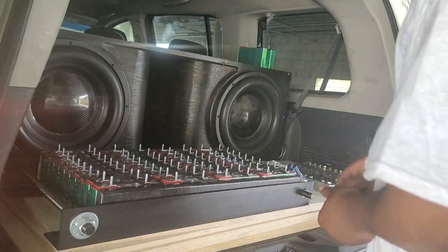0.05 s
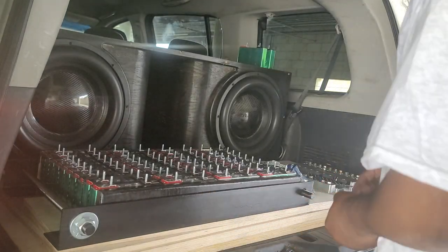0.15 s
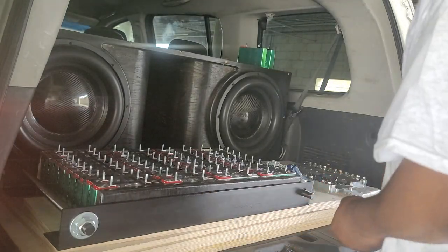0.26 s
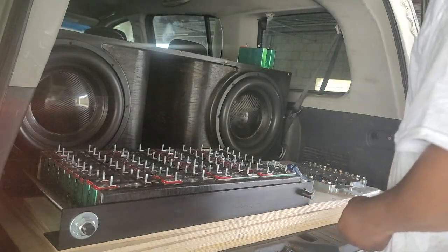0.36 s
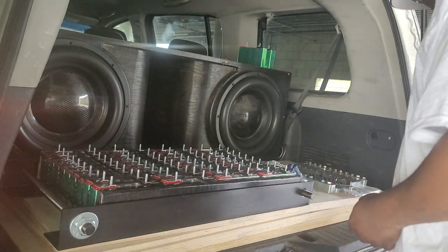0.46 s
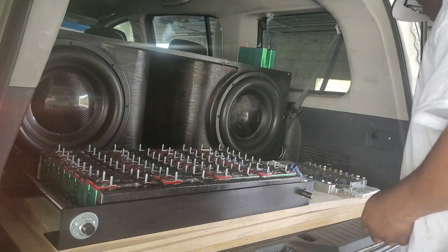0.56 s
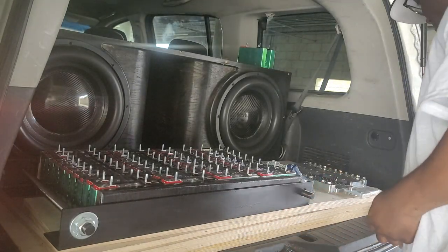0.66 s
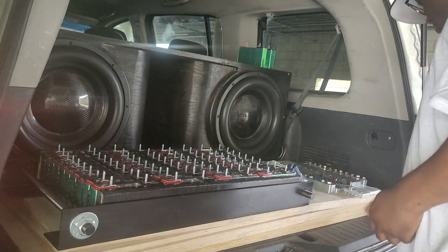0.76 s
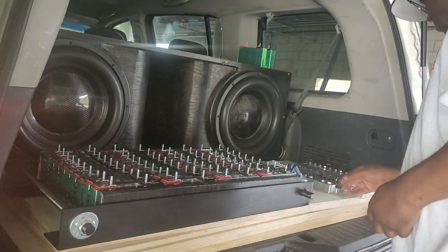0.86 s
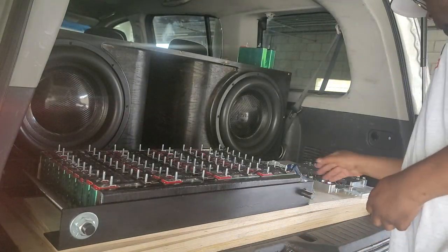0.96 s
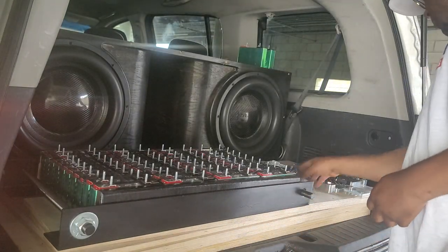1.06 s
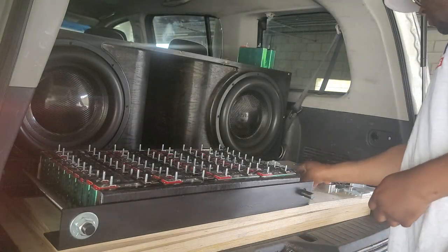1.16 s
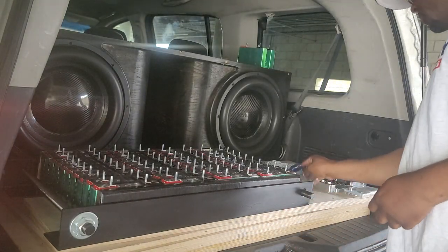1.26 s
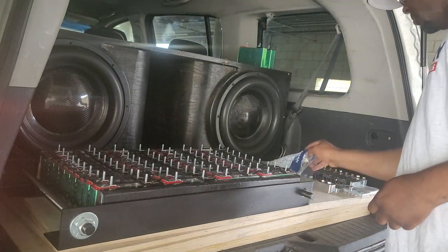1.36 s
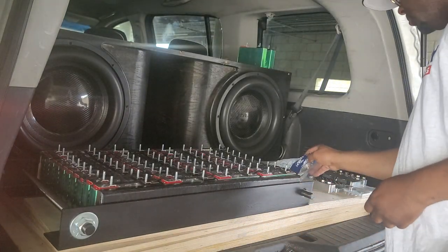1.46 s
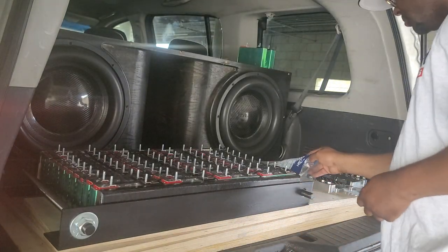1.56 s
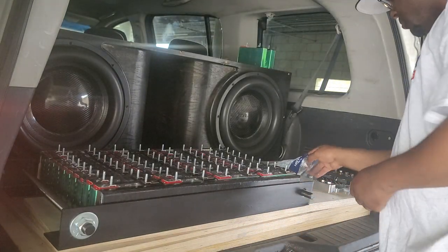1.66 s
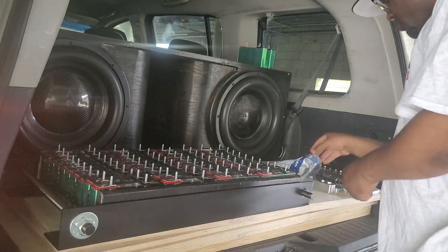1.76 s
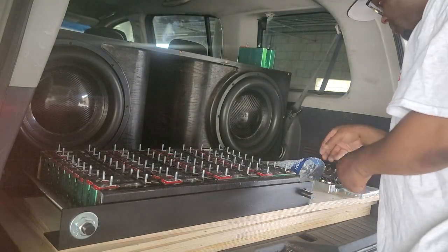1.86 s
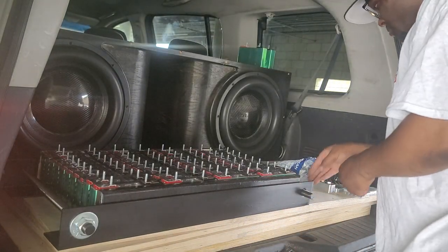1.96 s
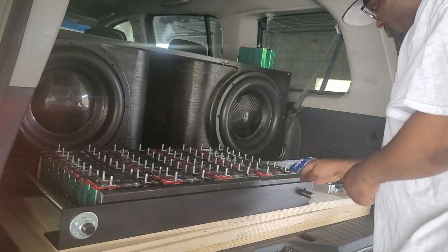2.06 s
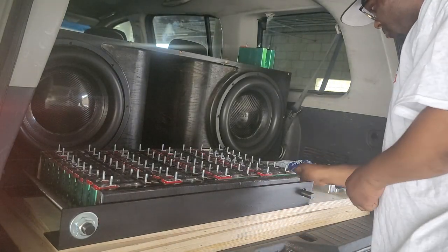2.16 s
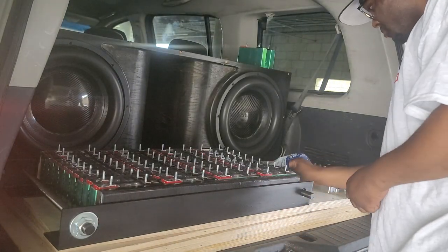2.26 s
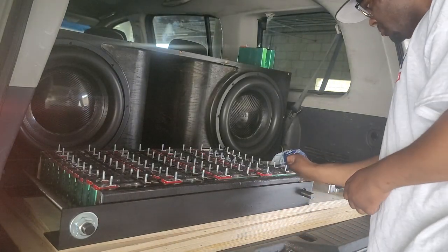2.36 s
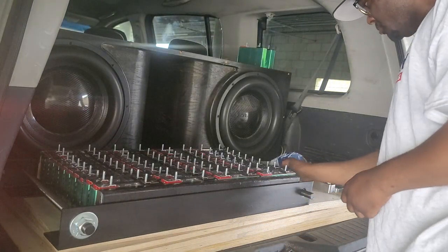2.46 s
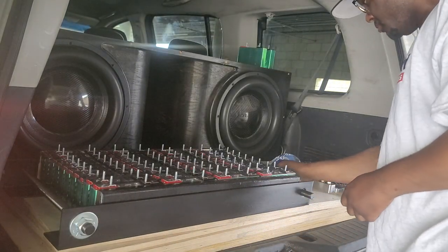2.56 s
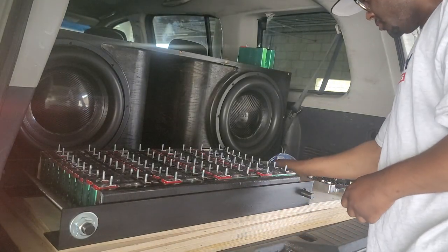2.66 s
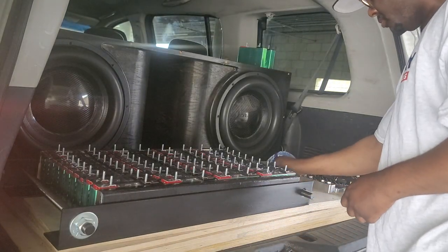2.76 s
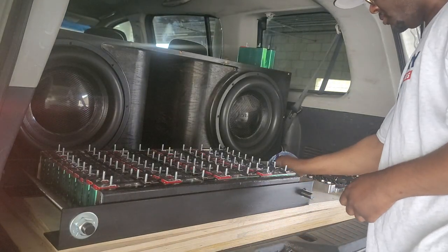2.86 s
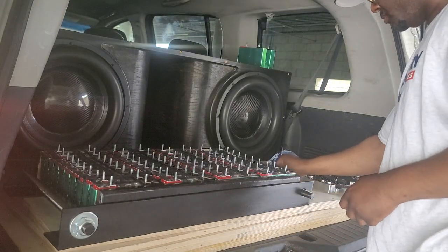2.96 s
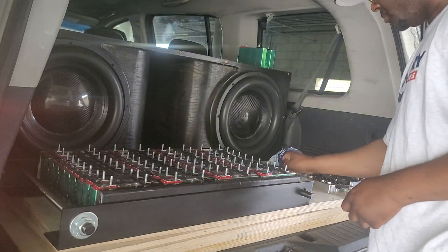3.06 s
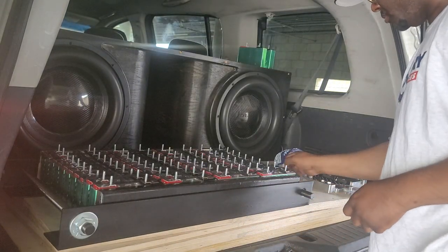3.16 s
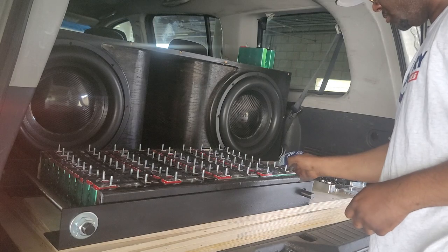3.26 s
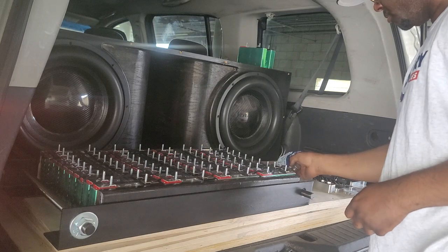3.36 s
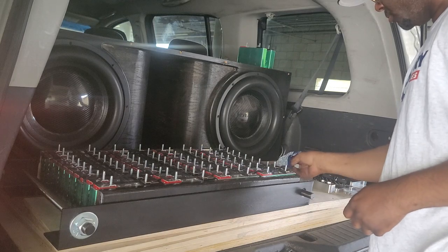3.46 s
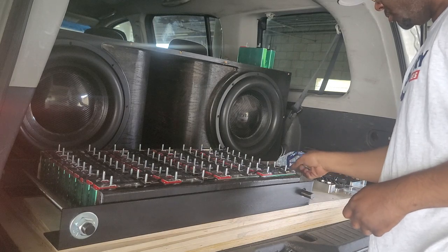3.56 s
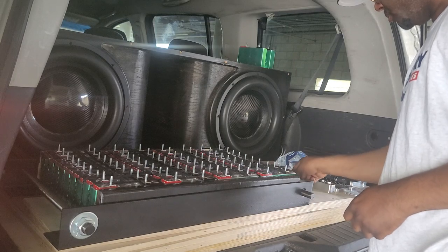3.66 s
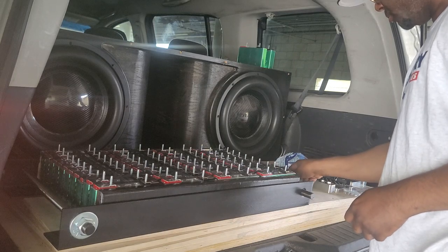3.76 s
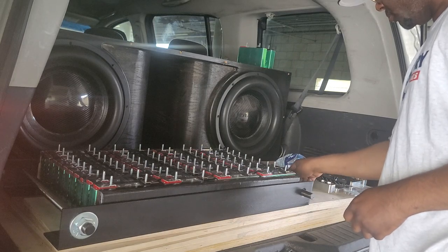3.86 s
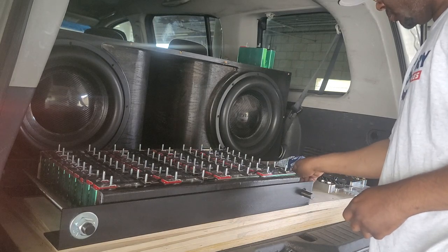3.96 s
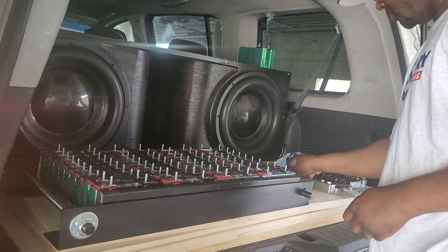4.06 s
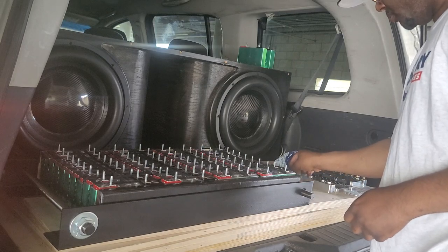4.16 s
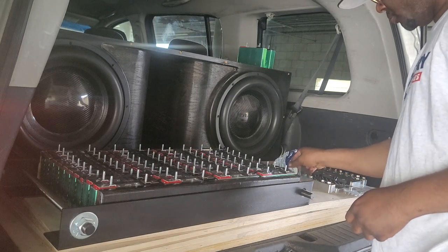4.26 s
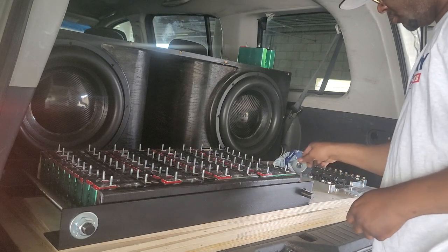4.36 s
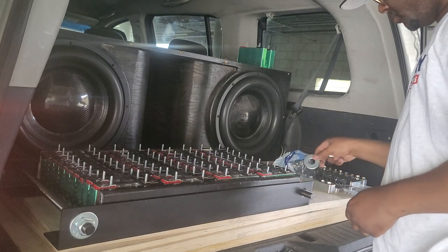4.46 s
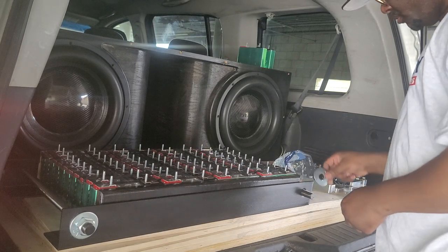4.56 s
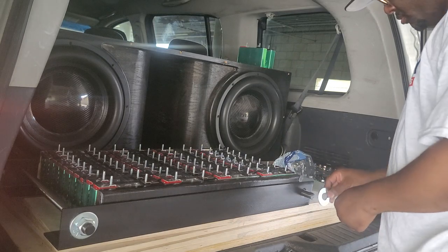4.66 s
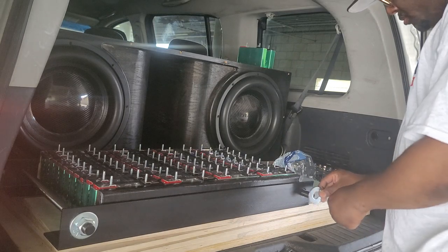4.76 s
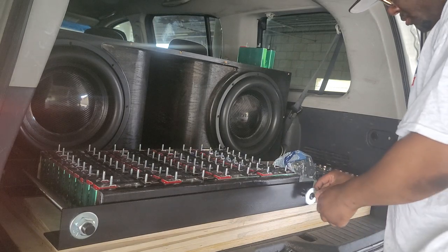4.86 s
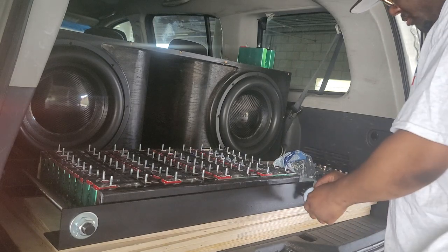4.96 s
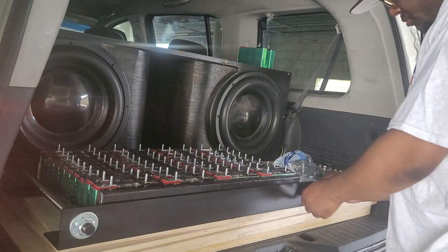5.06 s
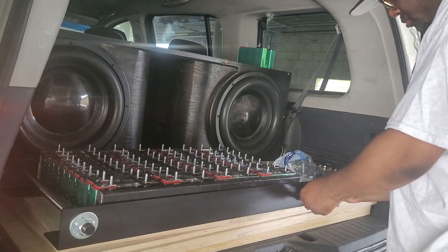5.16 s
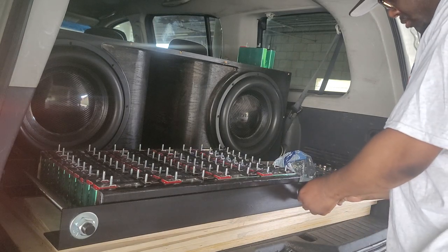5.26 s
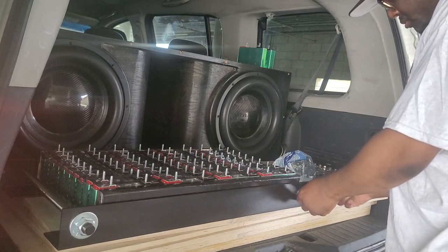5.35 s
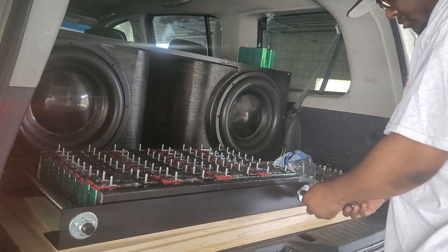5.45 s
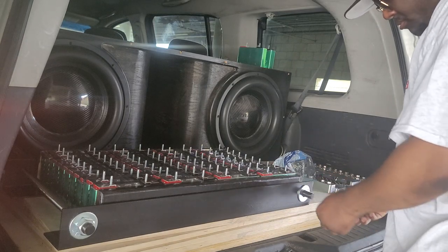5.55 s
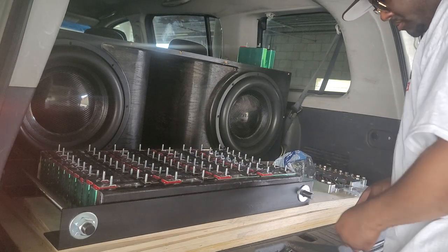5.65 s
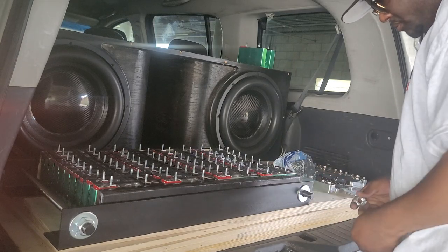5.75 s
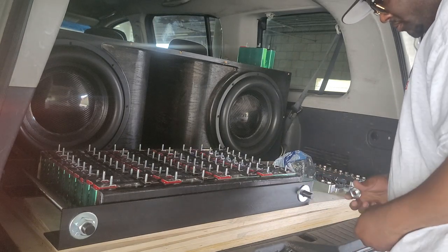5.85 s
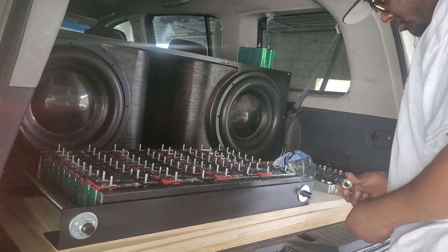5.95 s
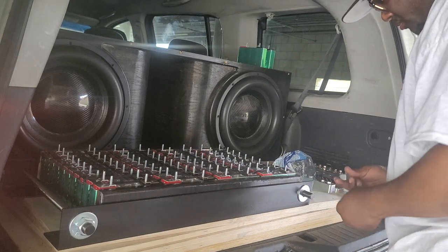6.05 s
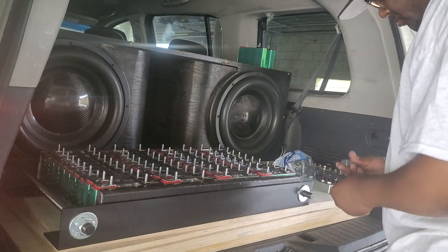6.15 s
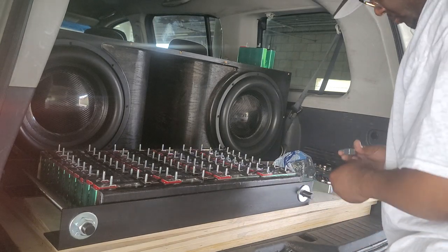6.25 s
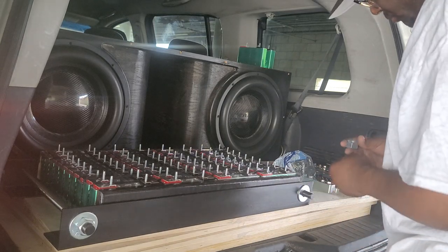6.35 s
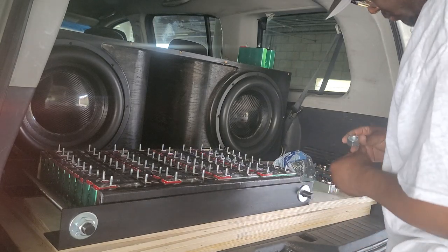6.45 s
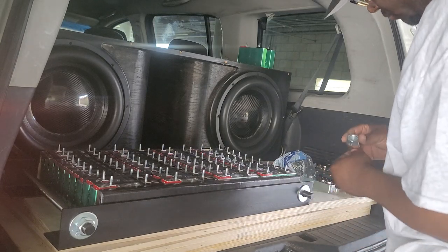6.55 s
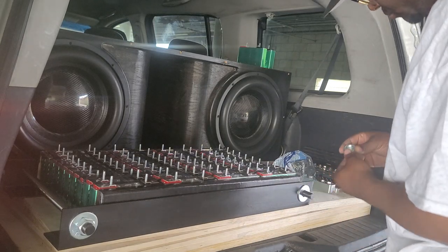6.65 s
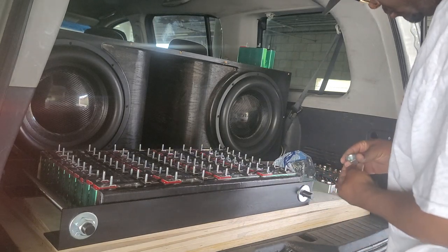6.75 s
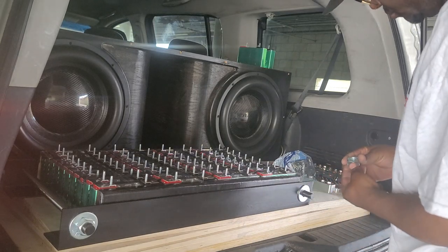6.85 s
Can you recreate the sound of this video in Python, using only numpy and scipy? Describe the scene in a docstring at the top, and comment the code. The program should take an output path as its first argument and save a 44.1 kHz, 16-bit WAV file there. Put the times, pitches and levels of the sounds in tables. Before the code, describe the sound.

A low, wavering drone of distant engines and soft outdoor rumble runs throughout, heard from the open back of a parked car. Around 0.6-0.8 s there is a faint scuff of clothing or shoes. From 1.2 s a hand digs into a thin plastic bag, crinkling; at 1.5-1.7 s washers clink loudly in a dense, bright cluster with firm knocks on the wooden board, one ringing on briefly. Softer crackling follows, with sharper clinks and knocks at 2.7-2.9 s, another handful at 3.05-3.5 s, and lighter ones at 3.9-4.3 s. The bag settles by about 4.6 s. At 4.9-5.05 s a washer ticks along a threaded rod, touches again near 5.37 s, then claps twice on a metal panel at 5.42 s, leaving a short metallic ring. Faint scuffs, tiny ticks and a dull board knock around 6.1 s precede quiet rumble until about 6.9 s.

```python
"""Steel washers in a plastic bag

In the open back of a parked car, a hand digs through a bag of washers lying on a wooden board.
The film crinkles as bursts of filtered noise; the washers clink as clusters of decaying sine modes.
One is slid onto a threaded rod and claps against a metal panel: noise contacts, then lasting modes.
Knocks, ticks and scuffs accompany it. Distant engines drone as wavering sines over rumbling noise.
"""
import sys
import numpy as np
from scipy import signal
from scipy.fft import rfft, irfft
from scipy.io import wavfile
from scipy.ndimage import map_coordinates

SR = 44100
rng = np.random.default_rng(int(sys.argv[2]) if len(sys.argv) > 2 else 0)


def inscribe(sig):
    """Save sig as 16-bit PCM at rate SR to the path in sys.argv[1].

    A 1-D sig is mono; a 2-D sig holds one channel per row.
    Samples are clipped to [-1, 1] before scaling.
    """
    pcm = np.round(np.clip(np.atleast_2d(sig).T, -1, 1) * 32767)
    wavfile.write(sys.argv[1], SR, pcm.astype(np.int16))


N = 304554
TIME = np.arange(N) / SR
AGE = TIME[:SR]   # the second after a blow

# Spectrum of the outdoor rumble: f/Hz, relative level/dB
AIR_SPECTRUM = [(15, -28.5), (30, -12), (45, -14.5), (60, -9), (76, -3), (97, -13), (120, -7.5), (148, -22),
                (290, -21.5), (420, -26.5), (600, -24.5), (2500, -40.5), (7000, -51.5), (9500, -64)]
# Likeness of the rumble in left and right: f/Hz, correlation
AIR_LIKENESS = [(60, 0.91), (150, 0.86), (300, 0.63), (700, 0), (2000, 0), (15000, 0.21)]
# Low drone of the distant engines: t/s, level/dB
DRONE_LEVEL = [(0.0, -45), (0.13, -41.5), (0.75, -62.5), (1.36, -49.5), (1.71, -55), (1.81, -46),
               (2.64, -45.5), (2.9, -58), (3.31, -40.5), (4.33, -62.5), (4.6, -50), (4.62, -57.5),
               (5.86, -44), (6.35, -55.5), (6.73, -44), (6.91, -47)]
# Hum of the idling engine: t/s, relative level/dB
HUM_LEVEL = [(0.0, -66), (1.29, -72.5), (2.0, -58.5), (2.58, -66), (3.25, -53), (4.08, -65.5), (6.91, -67)]
# Knocks on the board, and at 5.295 s a dull bump of the washer sliding along the rod's thread: t/s, relative
# level/dB, contact cut-off f/Hz
BOARD_KNOCKS = [(.35, -46, 1600), (1.545, -17.5, 2150), (1.563, -24, 3020), (1.569, -12, 3700),
                (1.624, -24, 1450), (1.647, -24.5, 1560), (1.674, -19, 3060), (1.72, -28, 2590),
                (2.609, -35, 2480), (2.708, -25, 3270), (2.846, -32.5, 3460), (2.883, -16.5, 3450),
                (3.023, -37, 1360), (3.301, -28.5, 3070), (3.378, -28, 2190), (3.547, -41, 1790),
                (3.754, -44.5, 900), (4.091, -28.5, 1650), (5.028, -29, 3300), (5.295, -41, 935),
                (6.105, -22.5, 1795)]
# Colour of a knock on the board: f/Hz, relative level/dB
BOARD_SPECTRUM = [(150, -29), (330, -10), (480, -5), (620, 7.5), (800, -4.5), (1050, 2), (1300, 1),
                  (1700, -3), (2200, -3.5), (3100, -4), (4000, -11.5), (8000, -2)]
# Longer resonances of the board: f/Hz, relative level/dB, t60/s
BOARD_RESONANCES = [(542, -9.5, 0.11), (602, -5, 0.4), (664, -7.5, 0.091), (770, -10.5, 0.17),
                    (985, -3.5, .16)]
# Shoes and clothes scuffing: t/s, length/s, level/dB
SCUFF_STROKES = [(.64, 0.02, -56.5), (.742, 0.098, -50), (5.8, .07, -61), (6.07, 0.094, -61.5)]
# Colour of a scuff: f/Hz, relative level/dB
SCUFF_SPECTRUM = [(710, -42.5), (1200, -8.5), (1970, -10), (2250, -11.5), (3460, -1), (4710, -5),
                  (7030, -10.5), (14000, -54.5)]
# Small ticks of fingers and metal: t/s, relative level/dB
HAND_TICKS = [(3.5132, -40.5), (4.5344, -50), (4.5776, -56.5), (5.215, -59), (6.0696, -52), (6.155, -52)]
# Movements of the hand in the bag: t/s, length/s, relative crinkle level/dB
BAG_DIGS = [(1.203, 0.12, -55.5), (1.25, 0.17, -52), (1.401, 0.31, -41.5), (1.732, .14, -48),
            (2.189, 0.21, -50.5), (2.4, 0.23, -60.5), (2.552, 0.2, -48), (2.809, .25, -51),
            (3.101, 0.1, -46.5), (3.232, 0.17, -49.5), (3.4, 0.093, -57), (3.826, 0.052, -53.5),
            (3.978, 0.18, -54.5), (4.215, 0.1, -53), (4.352, 0.06, -63.5)]
# Colour of a snapping crease: f/Hz, relative level/dB
BAG_SPECTRUM = [(200, -17.5), (400, 0), (620, 8.5), (850, 2), (1700, 3.5), (2700, 1), (3900, -1.5),
                (5500, 2.5), (7000, 1.5), (9000, -8.5), (11500, -4.5), (14000, -15.5), (15700, -6)]
# Clearest meetings of washers: t/s, relative tick level/dB, relative ring level/dB, lowest-mode t60/s
WASHER_CLINKS = [(1.492, -22, -25.5, 0.23), (1.505, -19, -14.5, 0.094), (1.521, -23, -20, 0.25),
                 (1.568, -14, -17, 0.094), (1.586, -18, -23.5, .2), (1.6733, -24, -22, 0.11),
                 (1.6859, -21.5, -24.5, .12), (1.713, -30, -27.5, .08), (1.801, -45, -36.5, 0.0734),
                 (2.4946, -51, -54.5, .08), (2.588, -34.5, -44, .16), (2.7054, -24, -27.5, 0.053),
                 (2.8442, -33.5, -38, 0.084), (2.8823, -20, -21, 0.045), (3.054, -36.5, -31.5, 0.12),
                 (3.129, -26, -23.5, 0.11), (3.177, -26.5, -27, .12), (3.1995, -27, -21.5, 0.12),
                 (3.2988, -34, -34, 0.203), (3.347, -27.5, -37.5, 0.2), (3.4527, -33.5, -38, 0.17),
                 (3.8804, -30, -48, .1), (4.027, -26.5, -38, 0.061), (4.0554, -30.5, -45.5, .16),
                 (4.109, -36.5, -40, 0.14), (4.242, -42, -40.5, 0.084), (4.2837, -41, -42.5, 0.14),
                 (5.365, -44, -43.5, 0.21), (5.418, -35, -31, 0.052)]
# Bending modes of a washer: mean f/Hz, relative spread between washers, left-right level/dB
WASHER_MODES = [(5347, 0.027, 2), (10370, 0.014, 1.5), (13830, 0.024, -2.5)]
# A washer swings free and rings on: t/s, lowest mode f/Hz, level/dB, t60/s, left-right level/dB
FREE_WASHERS = [(1.505, 5200, -21, .14, 13), (1.572, 5355, -13, 0.32, 10), (1.676, 5320, -39.5, 0.87, -10),
                (3.057, 5360, -41.5, .61, 2), (3.131, 5190, -21.5, 0.071, 22), (3.454, 5220, -33.5, 0.2, 2)]
# Washer touching the rod: t/s, contact level/dB, contact cut-off f/Hz, relative ring level/dB
ROD_CONTACTS = [(4.9163, -39, 7160, -19.5), (4.935, -41.5, 5000, -23.5), (5.005, -31.5, 2080, -36),
                (5.0261, -33, 2500, -31), (5.362, -36.5, 4430, -60.5), (5.375, -37, 2150, -55.5)]
# Colour of a contact on the rod: f/Hz, relative level/dB
ROD_SPECTRUM = [(200, -37), (450, -4.5), (950, -3), (1150, -6), (1450, 2), (1800, -2), (2500, -4),
                (5000, 0), (9000, -10.5), (16000, -15.5)]
# Modes of that washer: f/Hz, relative gripped level/dB, lingering level re contact/dB, lingering t60/s
ROD_WASHER_MODES = [(2514, -32, -30, .4), (3092, -13, -18, .7), (4554, -34, -29, .7), (5502, -1, -29, .6),
                    (5545, -14, -32, .55), (5582, -9, -30, .3), (6210, -22, -31, .65), (8125, -36, -42, .7),
                    (10170, -24, -36, .3), (10970, -31, -50, .2), (14860, -38, -47, .37)]
# Washer clapping against the panel: t/s, level/dB, t60/s
PANEL_CLAPS = [(5.418, -26, 0.066), (5.4372, -24.5, 0.056)]
# Colour of a clap on the panel: f/Hz, relative level/dB
PANEL_SPECTRUM = [(200, -27), (600, -10.5), (900, -7), (1200, -2.5), (1700, 0.5), (2000, -5), (3000, -1.5),
                  (3550, 2.5), (4400, -8.5), (5500, -2.5), (8500, -16), (10300, -16), (12500, -29),
                  (13750, -15), (15000, -28)]
# Lasting modes of the metalwork: f/Hz, relative level/dB, t60/s
METALWORK_MODES = [(1140, -6, .25), (2266, -8, 0.51), (2320, -3.5, 1), (2480, -6.5, 0.85), (2860, 0, 0.57),
                   (2770, -3.5, 0.53), (3140, -7, 0.55), (3100, -10.5, 0.98), (3490, -3, 0.4),
                   (3686, -5.5, 1.0), (3800, -7, 1), (3700, -6, 0.75), (5440, -23, .9), (10260, -17, 0.37),
                   (14020, -20, 0.42)]


def from_db(db):
    """Level: amplitude is ten to the power of dB / 20."""
    return 10 ** (np.asarray(db) / 20)


def rms_one(x):
    """Normalization: equal mean power gives rms 1."""
    return x / np.sqrt(np.mean(x ** 2) + 1e-20)


def struck(x):
    """Normalization of a blow: rms 1 over its first 20 ms."""
    return x / np.sqrt(np.mean(x[:, :SR // 50] ** 2) + 1e-20)


def fade(t60, size=SR):
    """Exponential damping: 60 dB are lost in t60 seconds."""
    return np.exp(-np.log(1000) * AGE[:size] / max(t60, .003))


def swell(rise, size=SR):
    """Exponential build-up with time constant rise, in seconds."""
    return 1 - np.exp(-AGE[:size] / rise)


def pan(db):
    """Stereo level difference: left exceeds right by db."""
    return from_db(np.array([[db], [-db]]) / 2)


def at_hz(points, hz):
    """Interpolation on a logarithmic frequency axis."""
    f, value = np.transpose(points)
    return np.interp(np.log(hz + 1), np.log(f), value)


def level(rows):
    """Envelope: gain along a curve of dB over time."""
    return from_db(np.interp(TIME, *np.transpose(rows)))


def add(out, s, sound):
    """Superposition: a sound joins the sum at s seconds."""
    start = int(s * SR)
    out[:, start:start + sound.shape[1]] += sound[:, :N - start]


def colour(x, spectrum):
    """Minimum-phase filtering: the folded cepstrum gives a causal response with this spectrum."""
    size = 2048
    magnitude = from_db(at_hz(spectrum, np.fft.rfftfreq(size, 1 / SR)))
    cepstrum = irfft(np.log(magnitude))
    cepstrum[1:size // 2] *= 2
    cepstrum[size // 2 + 1:] = 0
    response = irfft(np.exp(rfft(cepstrum)))
    return signal.oaconvolve(x, response[None], axes=1)[:, :x.shape[1]]


def drift(rate):
    """Slow random variation: a spline through unit-variance knots, rate of them per second."""
    knots = rng.standard_normal(2048)
    coarse = TIME[::100]
    return np.interp(TIME, coarse, map_coordinates(knots, [coarse * rate], order=3, mode="wrap"))


def blow(spectrum, t60, cut_hz=None, rise=0.001, alike=0.34, order=8):
    """Impact: noise, smeared by quick reflections off nearby boxes, coloured by the struck body."""
    size = SR // 8
    shared, own = rng.standard_normal(size), rng.standard_normal((2, size))
    burst = (own + alike * shared) * fade(t60, size) * swell(rise, size)
    x = colour(burst, spectrum)
    if cut_hz:   # a soft contact lacks treble
        lowpass = signal.butter(order, min(cut_hz, SR * .45), fs=SR, output="sos")
        x = signal.sosfilt(lowpass, x)
    return struck(x)


def ring(hz, envelope, scatter=0.21):
    """Normal mode: a sine whose phase differs at each microphone; scatter is in cycles."""
    phase = rng.random() + scatter * rng.standard_normal((2, 1))
    return np.sin(2 * np.pi * (hz * AGE[:len(envelope)] + phase)) * envelope


def cluster(hz, spread, envelope, count=8):
    """Beating: close modes scattered around one pitch interfere."""
    offsets = np.linspace(-1.6, 1.6, count) + rng.uniform(-.2, .2, count)
    return struck(sum(np.exp(-k * k / 4) * ring(hz * (1 + spread * k), envelope) for k in offsets))


def strokes(rows, attack_s, t60):
    """Movement envelope: each stroke builds up, holds for its length and dies away."""
    out = np.zeros((1, N))
    for s, length, db in rows:
        release_db = -60 * np.maximum(AGE - length, 0) / t60
        add(out, s, from_db(db + release_db) * np.minimum(AGE / attack_s, 1)[None])
    return out[0]


def outdoors(air_db=-48, drone_hz=42.8, hum_hz=78.7, hum_db=-1, waver_hz=0.95):
    """Partly coherent noise makes the rumble; frequency-modulated sines make drone and overtones."""
    hz = np.fft.rfftfreq(N, 1 / SR)
    mid, side = rfft(rng.standard_normal((2, N))) * from_db(at_hz(AIR_SPECTRUM, hz))
    alike = np.clip(at_hz(AIR_LIKENESS, hz), -1, 1)
    opposed = side * [[1], [-1]]
    air = rms_one(irfft(np.sqrt(1 + alike) * mid + np.sqrt(1 - alike) * opposed, N))
    drone = np.sin(2 * np.pi * np.cumsum(drone_hz + waver_hz * drift(4.6)) / SR)
    turn = 2 * np.pi * np.cumsum(hum_hz + .5 * drift(6.5)) / SR
    hum = np.sin(3 * turn) + np.sin(2 * turn)   # overtones only
    engines = level(DRONE_LEVEL) * drone + from_db(hum_db) * level(HUM_LEVEL) * hum
    return (from_db(air_db) * air + np.sqrt(2) * engines) * pan(-0.64)   # sqrt 2: sine rms to peak


def board(gain_db=-11, side_db=-3.0, knock_t60=0.057, soft_hz=1742, soft_ring_db=-25.5, db_per_octave=10):
    """Contact stiffness: washers and knuckles bump wood, and a washer sliding on the thread bumps dully; softer
    contacts dull it and damp its ring."""
    out = np.zeros((2, N))
    for s, db, cut_hz in BOARD_KNOCKS:
        knock = blow(BOARD_SPECTRUM, knock_t60, cut_hz, rise=0.0017, alike=0.78)
        add(out, s, from_db(db + gain_db) * knock)
        ring_db = db + soft_ring_db + db_per_octave * np.log2(cut_hz / soft_hz)
        for hz, mode_db, mode_t60 in BOARD_RESONANCES:
            add(out, s, from_db(ring_db + mode_db) * ring(hz, fade(mode_t60, size=SR // 4)))
    return out * pan(side_db)


def handling(tick_db=-12, tick_t60=0.0277, attack_s=0.0039, scuff_t60=0.16):
    """Friction and impact: shifting weight scuffs as enveloped noise, the hand ticks as short bursts."""
    rubbing = rms_one(colour(rng.standard_normal((2, N)), SCUFF_SPECTRUM))
    out = strokes(SCUFF_STROKES, attack_s, scuff_t60) * rubbing
    for s, db in HAND_TICKS:
        tick = blow([(800, -27), (6000, 13.0), (15000, -2)], tick_t60)
        add(out, s, from_db(db + tick_db) * tick)
    return out


def bag_effort(left_s=4.5, jolt_db=-23, jolt_s=.008, patchy_db=2.0):
    """Driving force: film gives way under the hand, then settles; clinks jolt it until the hand is out."""
    jolts = [(s, jolt_s, tick_db + jolt_db) for s, tick_db, ring_db, t60 in WASHER_CLINKS if s < left_s]
    digging = strokes(BAG_DIGS, attack_s=0.038, t60=0.28)
    jolting = strokes(jolts, jolt_s, t60=0.095)
    return np.hypot(digging, jolting) * from_db(patchy_db * drift(40))


def bag(per_s=900, size_db=2.0, snap_t60=0.025, gain_db=6.0, grind_db=-7, shift_db=3.0, count=16):
    """Crackling noise: differently coloured creases snap at random; washers faintly resonate with them."""
    effort = bag_effort()
    creases = []
    for _ in range(count):
        spectrum = [(hz, db + shift_db * rng.standard_normal()) for hz, db in BAG_SPECTRUM]
        creases.append(blow(spectrum, snap_t60))
    sizes = from_db(size_db * np.minimum(rng.exponential(1, N), 4)) * rng.choice([-1, 1], N)
    moving = effort > 1e-7
    film = np.zeros((2, N))
    for i in np.flatnonzero(moving & (rng.random(N) < per_s / SR)):
        add(film, TIME[i], sizes[i] * creases[i % count][:, :SR // 40])
    film = film / film[:, moving].std() * effort
    grind = np.zeros((2, N))   # the movement grinds the washers together
    for hz, spread, side_db in WASHER_MODES:
        b, a = signal.iirpeak(hz, 1 / (2 * spread), fs=SR)
        grind += signal.lfilter(b, a, film + 1e-18)
    return from_db(gain_db) * (film + from_db(grind_db) * grind)


def stray_clinks(per_s=12, tick_db=9.5, ring_db=-1, t60=.1, scatter_db=6.5):
    """Random events: faint clinks strew each dig, their strength scattered about that of the dig."""
    rows = []
    for s, length, db in BAG_DIGS:
        for chance, place, strength in rng.random((4, 3)):
            if chance < per_s * length / 4:   # four chances a dig
                force_db = db + scatter_db * (2 * strength - 1)
                rows.append((s + place * length, force_db + tick_db, force_db + ring_db, t60))
    return rows


def free_washers(rise, upper_db=-21):
    """Weak damping: a washer that swings free rings on in its bending modes."""
    out = np.zeros((2, N))
    for s, low_hz, db, t60, side_db in FREE_WASHERS:
        envelope = from_db(db) * fade(t60) * swell(rise)
        add(out, s, pan(side_db) * ring(low_hz, envelope, scatter=.1))
        scale = low_hz / WASHER_MODES[0][0]
        for hz, spread, upper_side_db in WASHER_MODES[1:]:
            add(out, s, from_db(upper_db) * pan(upper_side_db) * ring(hz * scale, envelope))
    return out


def washers(tick_db=-6, tick_t60=0.06, middle_db=-8.5, ring_db=-4, top_db=-2.5,
            rise=0.0048, tick_rise=0.00074, detune=.004, top_fade=0.94):
    """Coupled damping: a clink rings several nearly equal washers, soon damped by their neighbours."""
    size = SR // 6
    tick_spectrum = [(500, -19.5), (3900, -15), (6000, 0.0), (9000, -14.0), (12000, -8), (15500, -5)]
    out = free_washers(rise)
    for s, contact_db, low_db, t60 in list(WASHER_CLINKS) + stray_clinks():
        tick = blow(tick_spectrum, tick_t60, rise=tick_rise)
        add(out, s, from_db(contact_db + tick_db) * tick)
        bright_db = 0.19 * (low_db + 21.5)   # harder clinks are brighter
        pitch = 1 + detune * rng.standard_normal()   # other washers meet each time
        mode_levels = [0, bright_db / 2 + middle_db, bright_db + top_db]
        for (hz, spread, side_db), mode_db in zip(WASHER_MODES, mode_levels):
            octaves = np.log2(hz / WASHER_MODES[0][0])
            envelope = fade(t60 * top_fade ** octaves, size) * swell(rise, size)
            sound = pan(side_db) * cluster(hz * pitch, spread, envelope)
            add(out, s, from_db(low_db + mode_db + ring_db) * sound)
    return out


def rod(contact_t60=0.08, held_t60=0.061, modes_db=5, side_db=-1, waver_db=4.0, waver_per_s=45):
    """Two-stage decay: fingers damp most of the ring of a washer ticking along the rod; a little lingers."""
    out = np.zeros((2, N))
    for s, contact_db, cut_hz, ring_db in ROD_CONTACTS:
        add(out, s, from_db(contact_db) * blow(ROD_SPECTRUM, contact_t60, cut_hz, rise=0.0015, order=2))
        for hz, held_db, linger_db, t60 in ROD_WASHER_MODES:
            held = from_db(ring_db + held_db + modes_db) * fade(held_t60)
            linger = from_db(contact_db + linger_db) * fade(t60)
            grip = from_db(waver_db * drift(waver_per_s)[:SR] * swell(held_t60))   # the loose ring wavers
            add(out, s, ring(hz, (held + linger) * grip * swell(0.0012), scatter=0.095))
    return out * pan(side_db)


def panel(ring_db=-27.5, spread=0.011):
    """Modal density: the washer lands flat and bounces once; metalwork rings in crowds of close modes."""
    out = np.zeros((2, N))
    for s, db, t60 in PANEL_CLAPS:
        add(out, s, from_db(db) * blow(PANEL_SPECTRUM, t60, rise=0.0016))
        for hz, mode_db, mode_t60 in METALWORK_MODES:
            modes = cluster(hz, spread, fade(mode_t60, size=SR // 2), count=5)
            add(out, s, from_db(db + ring_db + mode_db) * modes)
    return out


def cabin(x, wet_db=-17.5, low_t60=1.0, high_t60=0.5, split_hz=4500, treble_db=-3):
    """Reverberation: car and surroundings add a faint diffuse noise tail, shorter in the treble."""
    white = rng.standard_normal((2, SR))
    low = signal.sosfilt(signal.butter(2, split_hz, fs=SR, output="sos"), white)
    high = signal.sosfilt(signal.butter(2, split_hz, "high", fs=SR, output="sos"), white)
    tail = (low * fade(low_t60) - from_db(treble_db) * high * fade(high_t60)) * swell(.006)
    unit_tail = tail / np.sqrt(np.sum(tail ** 2) / 2)
    return from_db(wet_db) * signal.oaconvolve(x, unit_tail, axes=1)[:, :N]


def scene():
    """Superposition: all handling sounds in the cabin, over the outdoor background."""
    near = board() + handling() + bag() + washers() + rod() + panel()
    return outdoors() + near + cabin(near)


def record(dry):
    """Band limitation: a steep elliptic low-pass cuts the top above 15.9 kHz."""
    return signal.sosfilt(signal.ellip(10, .2, 70, 15900, fs=SR, output="sos"), dry)


dry = scene()
out = record(dry)
inscribe(out)
```